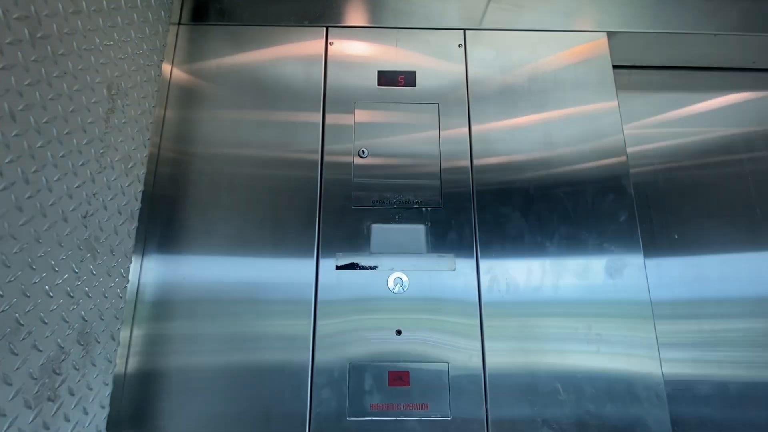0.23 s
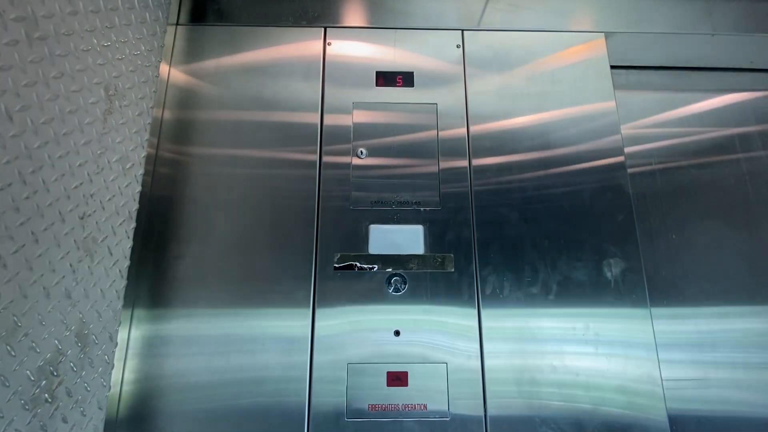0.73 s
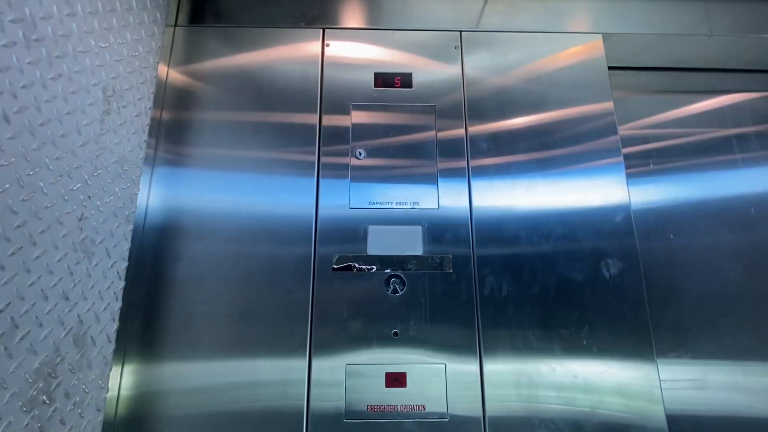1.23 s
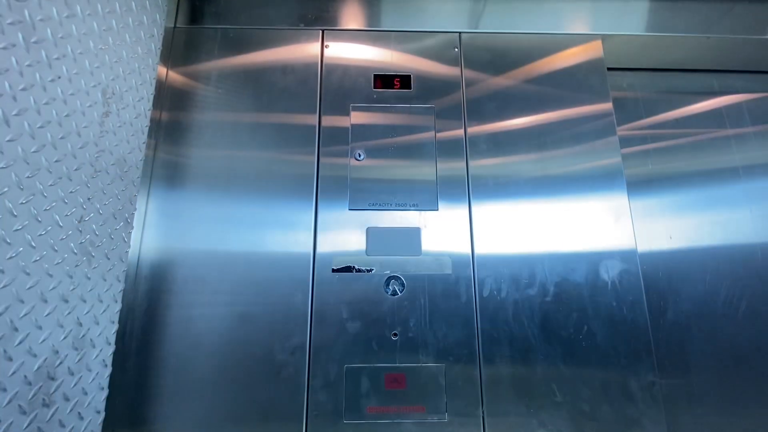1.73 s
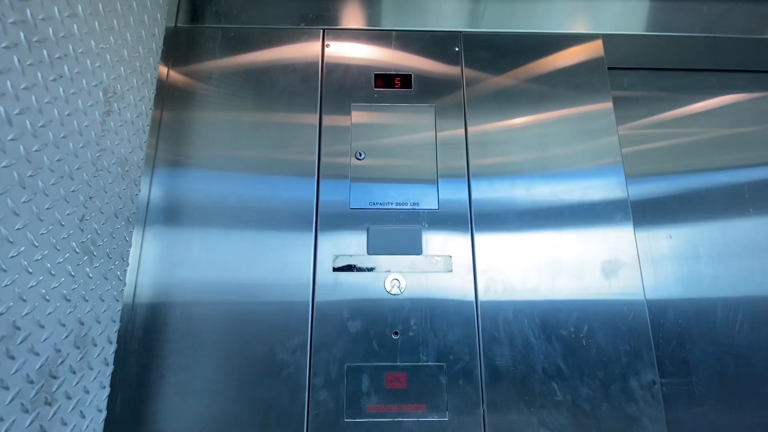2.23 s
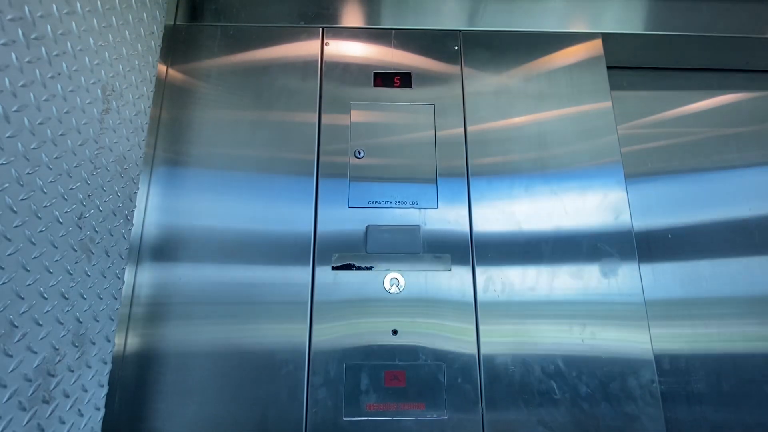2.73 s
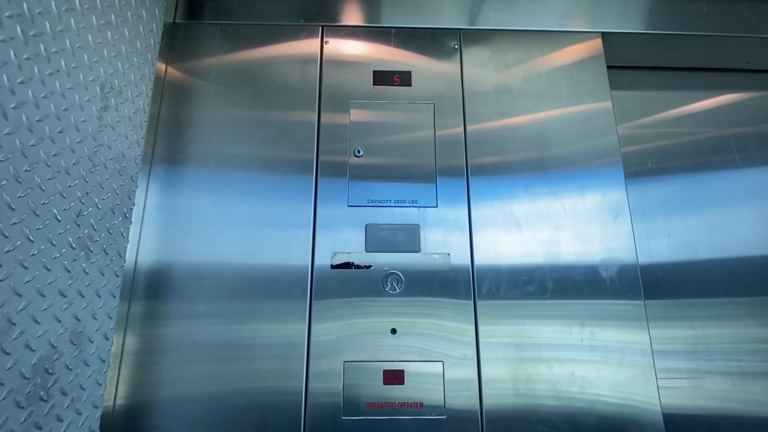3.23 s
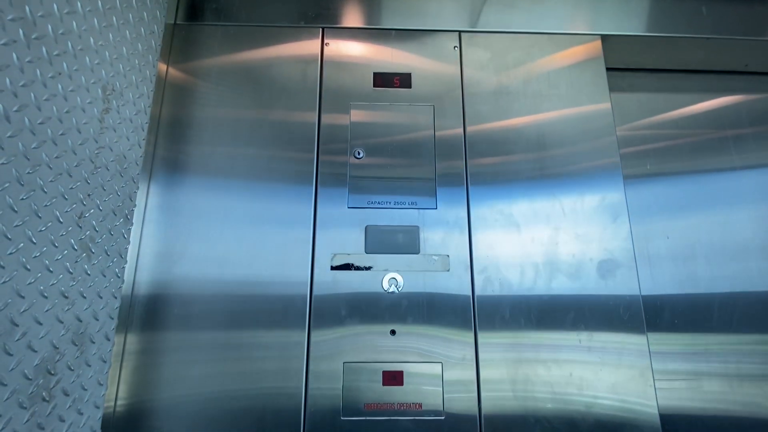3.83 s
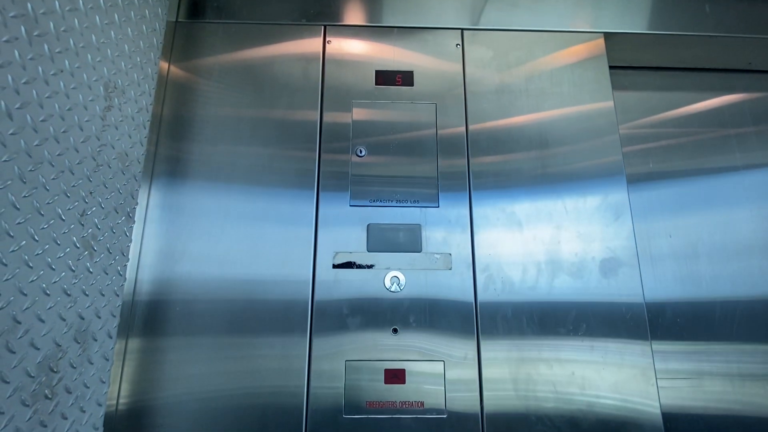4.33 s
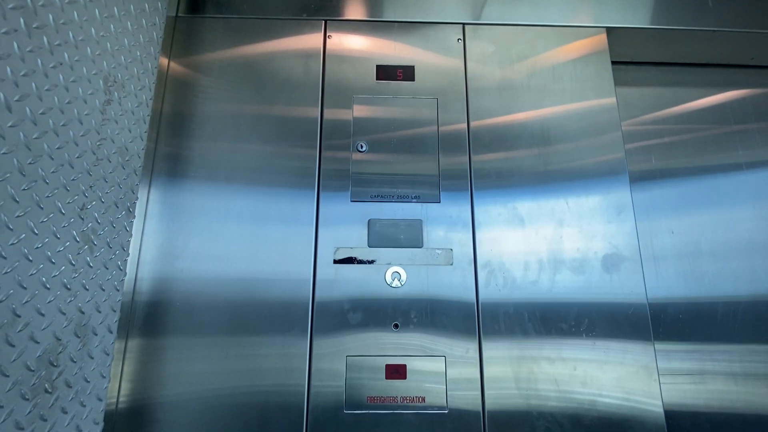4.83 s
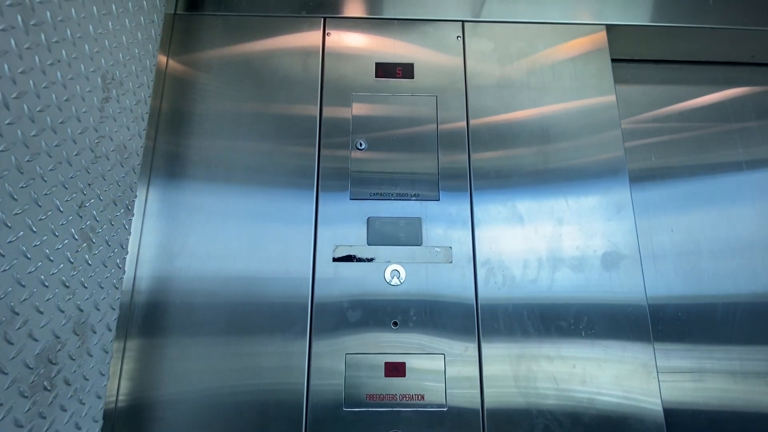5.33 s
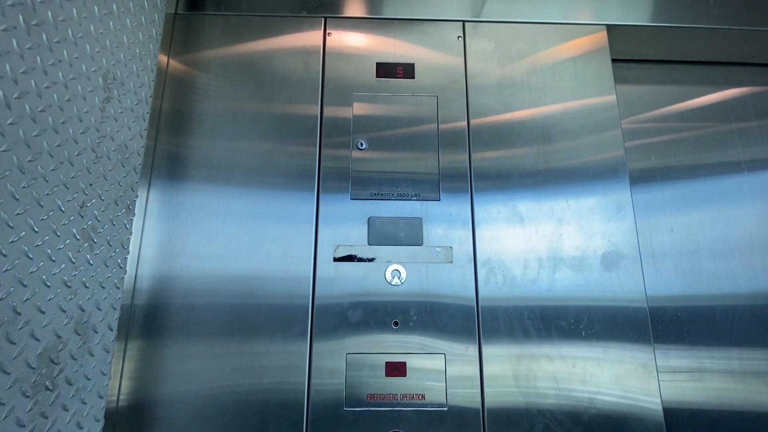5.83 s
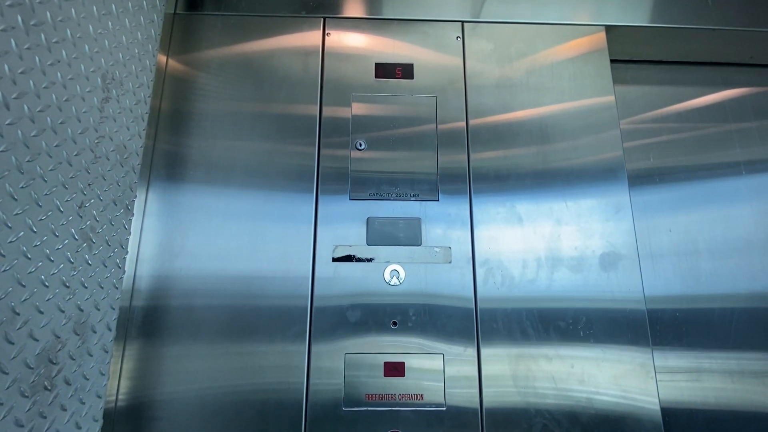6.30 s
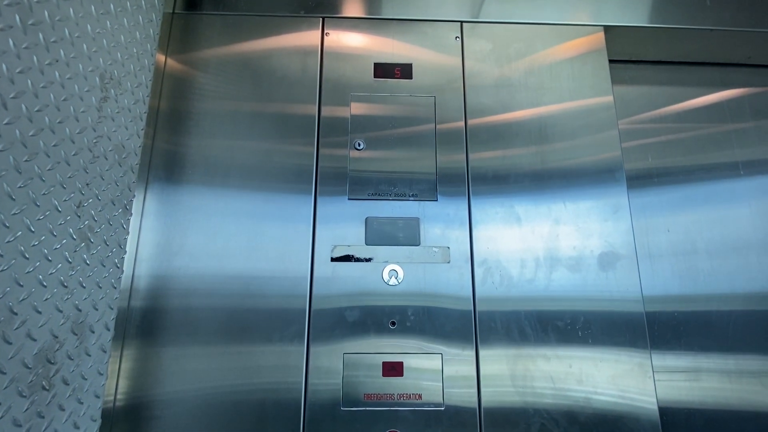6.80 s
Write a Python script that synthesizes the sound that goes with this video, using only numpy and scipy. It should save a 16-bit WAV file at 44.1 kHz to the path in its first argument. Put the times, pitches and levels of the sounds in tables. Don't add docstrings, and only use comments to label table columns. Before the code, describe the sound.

A phone in a metal lift car picks up a heavy bass drone, rumbling panels and soft oil hiss. One bright puff of air rings out, then the valve throttles with a descending breathy hiss while guide shoes scrape the rail twice. The drone keeps weakening as small ticking air puffs ring in the panels. Finally there is a faint wavering hum, a steady fan and one barely audible rub, in stereo.

```python
import sys
import numpy as np
from scipy import signal
from scipy.fft import rfft, irfft
from scipy.io import wavfile
from scipy.ndimage import uniform_filter1d

SR = 44100
rng = np.random.default_rng(int(sys.argv[2]) if len(sys.argv) > 2 else 0)


def waveform_to_disk(signal):
    frames = np.transpose(np.atleast_2d(signal))
    scaled = np.clip(frames, -1, 1) * 32767
    samples = np.round(scaled).astype(np.int16)
    wavfile.write(sys.argv[1], SR, samples)


def invert_db(x):
    u = np.asarray(x, float) / 20
    return 10 ** u


N = 311346
TIME_S = np.arange(N) / SR
BIN_HZ = np.fft.rfftfreq(N, 1 / SR)

# (time [s], rate [Hz])
SHAFT_HZ = [(0, 58.66), (1.2, 58.7), (3.1, 58.74), (3.5, 58.92), (7.06, 58.92)]
# (time [s], first order [dB], left minus right [dB])
UNBALANCE_DB = [(0, -19, 7.5), (.9, -17, 9), (1.6, -18, 8.5), (3.1, -21.5, 8.5), (3.6, -25, 9.5),
                (4.2, -26.5, 9), (4.66, -27.5, 5.5), (4.82, -32, 7), (5.1, -29.5, 7), (5.39, -33, 4.5),
                (5.48, -40.5, 5), (5.64, -42.5, 4), (5.79, -33.5, 1.5), (5.96, -40.5, 1.5), (6.05, -36, 0),
                (6.66, -33, 4), (6.82, -41, 4.5), (7.06, -33, 4.5)]
# (time [s], phase [rad])
PORT_LEAD_RAD = [(0, 0.8), (.5, 1.06), (1.0, 0.5), (7.06, 0.46)]
# (time [s], level re first order [dB])
SECOND_DB = [(1.7, -21.5), (2.7, -14.5), (4.2, -12.5)]
# (time [s], level [dB])
HUM_DB = [(0, -45), (.8, -44), (1.1, -62), (1.5, -43), (2.0, -37.5), (3.0, -36), (3.5, -50.5), (5.2, -53),
          (7.06, -63)]
# (level [dB], peak time [s], half length [s])
SCREW_WAVES_DB = [(-42.5, 0.42, 0.2), (-38.5, 1.1, 0.21), (-48.5, 1.65, 0.21), (-38, 2.4, 0.2),
                  (-38.5, 3.05, 0.19), (-45, 5.31, 0.089), (-48, 6.6, 0.17)]
FOURTH_WAVES_DB = [(-47.5, 0.25, 0.49), (-50.5, 0.77, 0.27), (-50.5, 1.96, 0.13), (-45.5, 2.78, .25),
                   (-43, 3.477, 0.34), (-50, 4.55, 0.24), (-54, 5.14, 0.22)]
FIFTH_WAVES_DB = [(-52.5, .25, .12), (-57, .75, .12), (-58, 0.6, .1), (-49, 2.21, 0.2), (-56, 3.28, 0.065)]
# (multiple of shaft rate [1], level [dB], peak time [s], half length [s])
FAINT_ORDERS_DB = [(2.8, -53, 1.76, 0.92), (3, -53.5, 0.68, 0.74), (3, -57.5, 2.9, 0.96),
                   (5.6, -62.5, 0.89, 1), (5.6, -58.5, 2.13, 0.58), (5.55, -59.5, 4.15, 1.6),
                   (7.5, -53, 1.1, 0.55), (7.15, -62, 3.85, 1.02), (8, -55.5, 0.85, 1.02),
                   (9, -54.5, 0.87, 0.22), (11.5, -56.5, 1.16, 0.4), (12, -58, 0.9, 0.77),
                   (14, -60, 1.1, 0.25), (14, -61, 1.85, 0.3), (13.95, -63, 3.44, 0.32),
                   (14.5, -60, 1.87, 0.79), (16.1, -54.5, 1, 0.28), (16.1, -57, 2.6, .4)]
# (time [s], level [dB])
SHAKE_DB = [(0, -36), (.08, -46), (3.0, -45), (3.2, -35), (3.6, -42), (5.25, -43.5), (5.6, -55), (6.0, -51),
            (6.35, -47)]
# (frequency [Hz], density [dB per Hz])
RUMBLE_SPECTRUM_DB = [(22, -23), (32, -7), (45, 1.5), (90, 3), (150, -8), (200, -18.5), (260, -16.5),
                      (330, -27.5)]
PANEL_SPECTRUM_DB = [(160, -15.5), (220, -0.5), (320, -2), (500, -4), (750, -5.5), (1050, -6.5),
                     (1300, -13.5), (1600, -14)]
# (frequency [Hz], width [Hz], gain [dB])
PANEL_MODES_HZ = [(336, 19, 9.5), (432, 14, 3.5), (699, 9.1, 4.5), (810, 55, 5.5), (935, 17.4, 10.5)]
# (time [s], rush level [dB])
OIL_RUSH_DB = [(0, -59.5), (.1, -57), (.55, -54.5), (1.0, -51.5), (1.3, -53), (1.9, -56.5), (2.5, -55.5),
               (2.92, -59.5), (3.3, -53.5), (3.5, -57), (3.65, -59), (4.1, -63), (5.3, -61.5), (5.9, -69),
               (7.06, -66)]
# (frequency [Hz], density [dB per Hz])
RUSH_SPECTRUM_DB = [(1000, -9), (1300, -10), (1650, -0.5), (2100, -1), (2600, -7.5), (3300, -11.5),
                    (4500, -11.5), (5200, -13), (5800, -15.5), (6700, -12), (7300, -31.5)]
HISS_SPECTRUM_DB = [(6600, -8), (7400, -6.5), (8450, -1.5), (10500, -9), (12800, -5.5), (13700, -12),
                    (14200, -28)]
# (time [s], centre [Hz], level [dB])
WHISTLE_HZ_DB = [(2.45, 12920, -94), (2.65, 12720, -70), (3.0, 10680, -65.5), (3.1, 9700, -60),
                 (3.5, 8800, -61), (3.85, 7430, -61.5), (4.15, 6800, -77), (4.3, 6600, -99)]
# (level [dB], peak time [s], half length [s])
SCRAPE_DB = [
    (-60, 3.09, 0.036),
    (-45.5, 3.225, 0.078),
    (-46, 3.405, .055),
    (-58, 3.53, 0.044),
    (-57, 6.61, .03),
]
# (frequency [Hz], density [dB per Hz])
RAIL_SPECTRUM_DB = [(300, -10.5), (450, 7.5), (1000, -21), (2000, -7), (3500, -10.5), (6500, -14.5),
                    (8000, -16), (10000, -45)]
# (frequency [Hz], width [Hz], level over the rubbing noise [dB])
RAIL_MODES_HZ = [(350, 25, -3), (439, 20, 10), (985, 45, 1), (1190, 20, 22), (1720, 22, -3), (1840, 18, 22),
                 (2100, 35, 6), (2564, 59, 13.5), (2640, 21, 7), (3270, 30, 10.5), (3710, 23, 20),
                 (4020, 35, 10), (4140, 40, 1), (4300, 24, 7), (4470, 32, 10), (4900, 40, 6),
                 (5140, 25, 11.5), (5900, 40, 12), (6400, 30, 11), (6450, 45, 9), (6940, 38, 3),
                 (7490, 40, 5)]
# (time [s], peak [dB], t60 [s], ring [Hz], ring level [dB])
SPITS_DB = [
    (2.089, -25, 0.46, 4480, -13),
    (2.519, -52, .3, 3810, 5),
    (3.44, -43.5, 0.46, 9000, -8),
    (4.29, -65.5, 0.11, 3760, 20.5),
    (4.354, -45, 0.56, 4460, -1),
    (4.642, -46, 0.47, 3440, -1),
    (5.003, -45.5, 0.4, 2140, 8),
    (5.03, -63.5, .45, 1900, 27),
    (5.192, -50, 0.48, 3510, 1),
]
# (frequency [Hz], density [dB per Hz])
SPIT_SPECTRUM_DB = [(1300, -24), (2300, -4), (2850, -2.5), (3150, -35), (3600, -4), (4400, -1.5),
                    (5700, -8.5), (6700, 1.5), (7800, -3), (9900, 1), (11500, -4), (13600, -6.5),
                    (14100, -28)]
# (frequency [Hz], density [dB per Hz])
FAN_SPECTRUM_DB = [(200, -15), (300, -4), (600, -2.5), (850, 0), (1100, 0), (1300, -9.5), (2500, -12),
                   (3300, -15), (4550, -19), (6700, -19.5), (7600, -26.5), (11000, -33.5), (14200, -39)]
# (frequency [Hz], width [Hz], gain [dB])
FAN_MODES_HZ = [(335, 40, 6.3), (658.4, 63, 10.9), (700, 13, 4.9), (1014, 70, 6), (1074, 17, 7.2),
                (1614, 250, 6.4), (2580, 750, 3.6), (5130, 360, 7.5), (8570, 650, 4.7)]


def motor(pan_db):
    hz, = curves(SHAFT_HZ)
    first_db = curves(UNBALANCE_DB)[0]
    lead_rad, = curves(PORT_LEAD_RAD)
    fourth_db = swells(FOURTH_WAVES_DB, floor_db=-57.5)
    fifth_db = swells(FIFTH_WAVES_DB, floor_db=-65)
    out = tone(hz, first_db + 0.3, pan_db, lead_rad, rough_db=0.23)
    out += tone(4 * hz, fourth_db, 1.4 * pan_db - 0.5, -0.13, rough_db=1.1)
    out += tone(5 * hz, fifth_db, 0.92 * pan_db, -0.48, rough_db=0.5)
    return out + mains_beat(hz, first_db, pan_db) + screws(hz, pan_db) + faint_orders(hz, pan_db)


def mains_beat(hz, first_db, pan_db):
    mains_hz, null_s = 60.03, 2.455
    slip_turns = np.interp(null_s, TIME_S, np.cumsum(2 * (mains_hz - hz)) / SR)
    second_db = first_db + curves(SECOND_DB)[0]
    hum_db, = curves(HUM_DB)
    second = tone(2 * hz, second_db, 1.1 * pan_db + 5.0, 0.43, rough_db=0.6, turns=0)
    hum_hz = np.full(N, 2 * mains_hz)
    hum = tone(hum_hz, hum_db, 0.88 * pan_db + 4.0, 0.21, rough_db=1.3, turns=0.5 - slip_turns)
    return second + hum


def screws(hz, pan_db):
    whine_db = swells(SCREW_WAVES_DB, floor_db=-58.5)
    return tone(2.4 * hz, whine_db, 2.0 * pan_db + 0.4, 0.38, rough_db=2.5)


def faint_orders(hz, pan_db):
    out = np.zeros((2, N))
    for order, db, peak_s, half_s in FAINT_ORDERS_DB:
        swell_db = db - 6 * ((TIME_S - peak_s) / half_s) ** 2
        lead_rad = rng.uniform(-3.05, 1.27)
        out += tone(order * hz, swell_db, 0.47 * pan_db, lead_rad, rough_db=3.0)
    return out


def rumble(pan_db):
    shake_db, = curves(SHAKE_DB)
    return invert_db(shake_db + 4) * sides(0.61 * pan_db) * noise(RUMBLE_SPECTRUM_DB, 0.82, 0.77, wet=0.022)


def panels(pan_db, flow_db):
    jolts = [(db + 2, peak_s, half_s) for db, peak_s, half_s in SCRAPE_DB]
    level_db = swells(jolts, floor_db=-47 + 0.56 * flow_db)
    both = noise(PANEL_SPECTRUM_DB, 0.57, 1.9, PANEL_MODES_HZ, wet=0.8)
    split_hz, slow_s, slow_length_s, slow_db = 500, 2.6, 0.65, -2.5
    small = irfft(rfft(both) / (1 + (split_hz / (BIN_HZ + 1)) ** 8), N)
    slowed = np.clip((TIME_S - slow_s) / slow_length_s, 0, 1)
    ringing = both - small * (1 - invert_db(slow_db * slowed))
    return invert_db(level_db - 1.0) * sides(0.27 * pan_db - 0.3) * ringing


def oil_rush(pan_db, rush_db):
    return invert_db(rush_db) * sides(0.14 * pan_db) * noise(RUSH_SPECTRUM_DB, 0.62, 1.0, wet=1.0)


def valve_hiss(pan_db, flow_db):
    shut_s, shut_length_s, shut_db, leak_db = 3.8, 1.1, -11, -82
    shut = np.clip((TIME_S - shut_s) / shut_length_s, 0, 1)
    hiss_db = -66.5 + 1.07 * flow_db + shut_db * shut
    gain = np.hypot(invert_db(hiss_db), invert_db(leak_db))
    return gain * sides(0.15 * pan_db) * noise(HISS_SPECTRUM_DB, 0.76, 0.78, wet=0.95)


def valve_whistle():
    hz, db = curves(WHISTLE_HZ_DB)
    return invert_db(db) * band(hz, width_hz=2700)


def scrape():
    rubbing = noise(RAIL_SPECTRUM_DB, 0.6, 1.5, RAIL_MODES_HZ, rate_hz=40, wet=0.12)
    return invert_db(swells(SCRAPE_DB, floor_db=-120)) * rubbing


def spits():
    bright = noise(SPIT_SPECTRUM_DB, 0.25, 0.15, rate_hz=60)
    out = np.zeros((2, N))
    for start_s, peak_db, t60_s, ring_hz, ring_db in SPITS_DB:
        age_s = np.maximum(TIME_S - start_s, 0)
        onset = 1 - np.exp(-age_s / 0.0004)
        decay = np.exp(-np.log(1000) * age_s / t60_s)
        tick = 1 + 0.4 * np.exp(-age_s / 0.0018)
        ring = band(ring_hz, width_hz=2.5e6 / ring_hz)
        ring = invert_db(ring_db) * np.exp(-age_s / 0.35) * ring
        out += invert_db(peak_db - 12) * onset * decay * tick * (bright + ring)
    return out * sides(1)[:, None]


def fan():
    return invert_db(-56) * sides(-2.1)[:, None] * noise(FAN_SPECTRUM_DB, 0.52, 1.0, FAN_MODES_HZ, wet=0.35)


def tone(hz, db, pan_db, lead_rad, rough_db, turns=None):
    start_turns = rng.random() if turns is None else turns
    phase = 2 * np.pi * (np.cumsum(hz) / SR + start_turns)
    gain = np.sqrt(2) * invert_db(db + rough_db * walk(14)) * sides(pan_db)
    return gain * np.sin([phase + lead_rad / 2, phase - lead_rad / 2])


def noise(spectrum_db, alike, flicker_db, modes=(), rate_hz=12, wet=0.91):
    hz, db = np.transpose(spectrum_db)
    shape_db = np.interp(np.log(BIN_HZ + 1), np.log(hz), db, left=-99, right=-99)
    for mode_hz, width_hz, gain_db in modes:
        shape_db = shape_db + gain_db / (1 + (2 * (BIN_HZ - mode_hz) / width_hz) ** 2)
    white = rng.standard_normal((3, N))
    ports = np.sqrt(alike) * white[0] + np.sqrt(1 - alike) * white[1:]
    spectrum = rfft(ports) * invert_db(shape_db) * car(wet)
    octave = np.log2(BIN_HZ / hz[0] + 1e-9)
    out = np.zeros((2, N))
    for k in range(int(np.log2(hz[-1] / hz[0])) + 2):
        weight = np.clip(1 - abs(octave - k), 0, 1)
        out += irfft(spectrum * weight, N) * invert_db(flicker_db * walk(rate_hz))
    return out / np.sqrt(np.mean(out.mean(axis=0) ** 2))


def car(wet):
    t60_s = 0.27
    tail = rng.standard_normal((2, N)) * np.exp(-np.log(1000) * TIME_S / t60_s)
    tail = rfft(tail) / np.sqrt(np.sum(tail ** 2, axis=1, keepdims=True))
    return np.sqrt(1 - wet) + np.sqrt(wet) * tail


def band(hz, width_hz):
    lowpass = signal.butter(2, width_hz / 2, fs=SR, output="sos")
    slow = signal.sosfilt(lowpass, rng.standard_normal((2, 2, N)))
    phase = 2 * np.pi * np.cumsum(hz * np.ones(N)) / SR
    out = slow[0] * np.cos(phase) + slow[1] * np.sin(phase)
    return out / out.std()


def swells(rows, floor_db):
    power = invert_db(floor_db) ** 2
    for db, peak_s, half_s in rows:
        swell_db = db - 6 * ((TIME_S - peak_s) / half_s) ** 2
        power = power + invert_db(np.maximum(swell_db, -150)) ** 2
    return 10 * np.log10(power)


def walk(rate_hz):
    hold = int(SR / rate_hz)
    steps = np.repeat(rng.standard_normal(N // hold + 1), hold)
    return 1.37 * uniform_filter1d(uniform_filter1d(steps, hold), hold)[:N]


def sides(pan_db):
    gains = invert_db(np.array([pan_db / 2, -pan_db / 2]))
    return gains / gains.mean(axis=0)


def curves(table):
    s, *columns = np.transpose(table)
    return [np.interp(TIME_S, s, column) for column in columns]


def scene():
    pan_db = curves(UNBALANCE_DB)[-1]
    rush_db, = curves(OIL_RUSH_DB)
    flow_db = rush_db + 56
    out = motor(pan_db) + rumble(pan_db) + panels(pan_db, flow_db)
    out += oil_rush(pan_db, rush_db) + valve_hiss(pan_db, flow_db) + valve_whistle()
    return out + scrape() + spits() + fan()


def low_pass(x):
    return signal.sosfilt(signal.butter(12, 14320, fs=SR, output="sos"), x)


def record(dry):
    mono_hz, top_hz = 11150, 13900
    mid = dry.mean(axis=0)
    side = irfft(rfft(dry[0] - mid) / (1 + (BIN_HZ / mono_hz) ** 60), N)
    mid = irfft(rfft(mid) / (1 + (BIN_HZ / top_hz) ** 120), N)
    return low_pass(np.array([mid + side, mid - side]))


dry = scene()
out = record(dry)
waveform_to_disk(out)
```